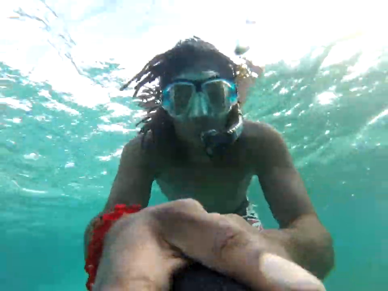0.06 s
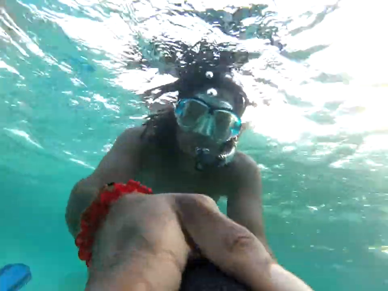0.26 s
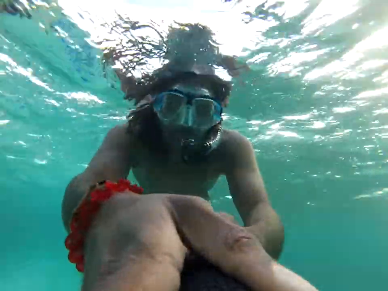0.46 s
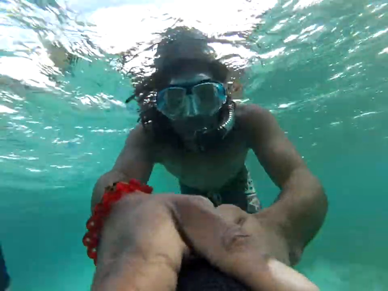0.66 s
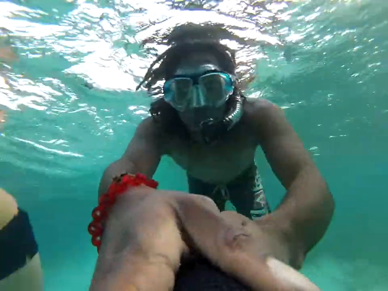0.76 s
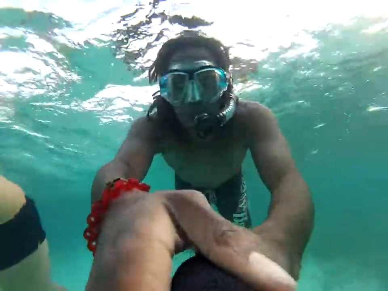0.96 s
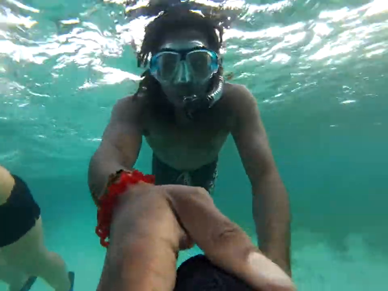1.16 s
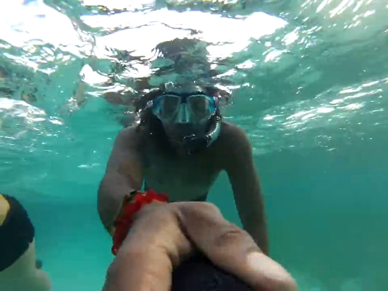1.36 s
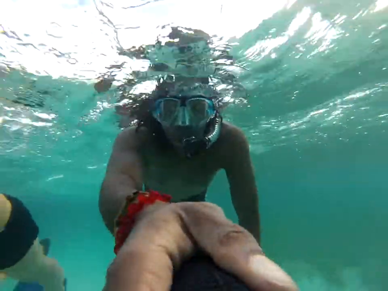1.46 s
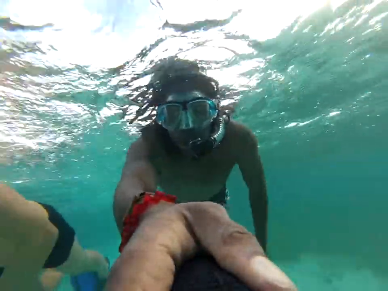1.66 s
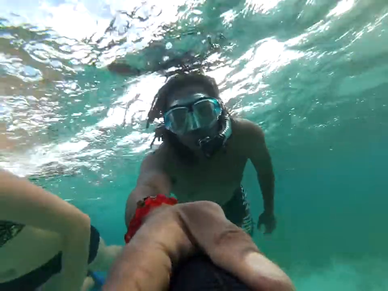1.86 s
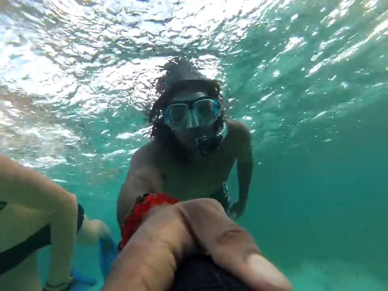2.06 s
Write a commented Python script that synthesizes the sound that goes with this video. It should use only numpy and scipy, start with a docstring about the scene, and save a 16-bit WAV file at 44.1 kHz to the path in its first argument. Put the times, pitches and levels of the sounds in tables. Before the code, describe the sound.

Muffled underwater rumble surges unevenly as swimmers move in shallow sea. A small bubble pings early, the surface gurgles overhead, and later something knocks once, followed by faint fizzing bubbles. The microphone is just below the surface.

```python
"""Shallow sea, among swimmers; microphone in a hand-held waterproof housing just under the surface.
Close up, moving water shoves against the housing and makes it rumble and boom. Just overhead the
surface sloshes, its bubbles ringing in a narrow, hollow band. A small bubble pings early on; later
something knocks once and a cloud of fine bubbles passes. Faint fizz and tiny snaps lie on top."""
import sys
import numpy as np
from scipy import signal
from scipy.fft import rfft, irfft
from scipy.io import wavfile
from scipy.ndimage import uniform_filter1d

SR = 44100
rng = np.random.default_rng(int(sys.argv[2]) if len(sys.argv) > 2 else 0)


def transcribe(signal):
    """Save signal, clipped to [-1, 1], as a 16-bit WAV file at the path in sys.argv[1]."""
    frames = np.atleast_2d(signal).T
    limited = np.clip(frames, -1, 1)
    pcm = np.round(limited * 32767).astype(np.int16)
    wavfile.write(sys.argv[1], SR, pcm)


N = 93315
T = np.arange(N) / SR
BIN_HZ = np.maximum(np.arange(N // 2 + 1) * SR / N, 1)
CUTOFF_HZ = 15300


def from_db(db):
    """Decibels to gain."""
    return 10 ** (np.asarray(db) / 20)


def unit_rms(x):
    """Scale to unit power."""
    return x / np.sqrt(np.mean(x ** 2) + 1e-20)


def level(points):
    """Gain through time from (time_s, level_db) points."""
    return from_db(np.interp(T, *np.transpose(points)))


def colour(x, points):
    """Filter through (frequency_hz, gain_db) points, falling steeply past both ends; rms 1."""
    hz, db = np.transpose(points)
    skirts = np.minimum(BIN_HZ / hz[0], 1) ** 3 * np.minimum(hz[-1] / BIN_HZ, 1) ** 4
    gain = from_db(np.interp(np.log(BIN_HZ), np.log(hz), db))
    return unit_rms(irfft(rfft(x) * skirts * gain, N))


def steady(x, span_s):
    """Hold a noise near rms 1 over spans longer than span_s."""
    return x / np.sqrt(uniform_filter1d(x ** 2, max(int(span_s * SR), 2)) + 1e-9)


def clicks(per_s, spread_db):
    """Clicks at random times, with a spread of sizes; rms 1."""
    sizes = from_db(spread_db * np.minimum(rng.exponential(1, N), 4)) * rng.choice([-1, 1], N)
    return unit_rms(sizes * (rng.random(N) < per_s / SR))


def tone(start_s, hz, drive_s, attack_s, t60_s, glide_per_s=0):
    """A resonance is driven for drive_s, then rings out; it glides by a share of its pitch a second."""
    t = np.maximum(T - start_s, 0)
    swell = np.sin(np.pi / 2 * np.minimum(t / attack_s, 1)) ** 2
    decay = from_db(-60 * np.minimum(np.maximum(t - drive_s, 0) / t60_s, 10))
    return swell * decay * np.sin(2 * np.pi * hz * t * (1 + glide_per_s * t / 2))


def swarm(per_s, centre_hz, spread_octaves, t60_s, glide_per_s=8.18):
    """Bubbles form at random, each a short rising note of its own pitch and strength; rms 1."""
    out, t = np.zeros(N), T[:int(2 * t60_s * SR)]
    for when, pitch, chance in rng.random((int(per_s * N / SR), 3)):
        start = int(when * N)
        hz = centre_hz * 2 ** (spread_octaves * (2 * pitch - 1))
        size_db = 2.5 * min(-np.log(1 - chance), 3)
        envelope = (1 - np.exp(-t * hz / 2)) ** 2 * from_db(size_db - 60 * t / t60_s)
        note = envelope * np.sin(2 * np.pi * hz * t * (1 + glide_per_s * t / 2))
        out[start:start + len(t)] += note[:N - start]
    return unit_rms(out)


def surge():
    """Water pushes past right at the housing: lumpy pressure and the rumble of its eddies."""
    # strength of the slow push and of the eddies: time_s, level_db
    push_levels = [(0, -25.5), (.16, -29.5), (.25, -23), (.34, -23), (.38, -34), (.43, -23), (.52, -32),
                   (.61, -39.5), (.86, -30), (1.02, -29), (1.08, -15), (1.17, -27.5), (1.28, -23),
                   (1.35, -28.5), (1.52, -38.5), (1.6, -33.5), (1.76, -44), (1.85, -35), (2.12, -50.5)]
    eddy_levels = [(0, -41.5), (.25, -44.5), (.47, -51.5), (.58, -42.5), (.73, -34), (.84, -45.5),
                   (1.1, -40.5), (1.19, -48), (1.33, -40), (1.52, -49), (1.58, -46), (1.8, -55.5),
                   (1.97, -55), (2.1, -42.5)]
    # their spectra: frequency_hz, gain_db
    push_spectrum = [(12, -2), (18, -1), (26, 1.5), (38, -7), (52, -11), (70, -15)]
    eddy_spectrum = [(50, -6), (75, -2), (105, 1.5), (150, -10), (220, -18), (330, -22.5)]
    push = steady(colour(rng.standard_normal(N), push_spectrum), span_s=0.058)
    eddies = steady(colour(rng.standard_normal(N), eddy_spectrum), span_s=0.076)
    return level(push_levels) * push + level(eddy_levels) * eddies


def slosh():
    """Just above the microphone a crowd of bubbles rings in a hollow band; the large ones glug."""
    # sloshing of the surface: time_s, level_db
    slosh_levels = [(0, -46.5), (.08, -45), (.2, -45), (.3, -52), (.48, -47), (.6, -49), (.75, -43),
                    (.83, -50.5), (.88, -44.5), (1.0, -48), (1.1, -38.5), (1.16, -51.5), (1.21, -43),
                    (1.32, -38.5), (1.42, -43), (1.56, -41), (1.65, -50.5), (1.75, -44.5), (1.86, -50.5),
                    (1.97, -44), (2.05, -53)]
    # its hollow band: frequency_hz, gain_db
    spectrum = [(230, -14), (350, -10.5), (410, -1.5), (500, 1.5), (610, -0.5), (700, -14), (860, -20.5),
                (1000, -37.5)]
    # large bubbles: start_s, level_db, pitch_hz, drive_s, glide_per_s
    burbles = [(0.351, -38.5, 597, 0.012, -0.5), (.468, -41, 566, .036, -2.5), (0.751, -32, 615, 0.0076, 4),
               (.871, -38, 525, .0076, 0), (1.09, -35.5, 408, 0.013, 2.5), (1.185, -32.5, 397, 0.018, 11),
               (1.217, -31, 458, 0.0176, 6), (1.24, -35.5, 510, 0.023, 4),
               (1.372, -25.5, 416.6, 0.017, 9.5), (1.429, -36, 416, .028, 0.5),
               (1.432, -32.5, 490.5, .033, 3), (1.491, -31, 503, .012, 8.5),
               (1.528, -30.5, 510, 0.035, -0.8), (1.535, -30, 597, 0.0063, -2),
               (1.559, -32.5, 381, 0.0074, -9.5), (1.589, -35, 478, 0.014, 5.5),
               (1.847, -36, 763, 0.0063, 4.5), (1.927, -40.5, 497, 0.019, 2),
               (2.07, -39.5, 487, 0.0082, 3.5), (2.094, -47.5, 790, 0.014, 0.5)]
    ringing = from_db(-2) * swarm(per_s=70, centre_hz=474.6, spread_octaves=0.24, t60_s=0.071)
    patter = colour(clicks(per_s=1000, spread_db=3), spectrum)
    glugs = sum(from_db(db) * tone(start_s, hz, drive_s, attack_s=0.011, t60_s=0.033, glide_per_s=glide)
                for start_s, db, hz, drive_s, glide in burbles)
    return level(slosh_levels) * steady(patter + ringing, span_s=0.05) + glugs


def churn():
    """Dense small bubbles rustle with the swimmers' strokes."""
    # churning of the water: time_s, level_db
    churn_levels = [(0, -60), (.23, -56), (.28, -62.5), (.56, -61.5), (.67, -56.5), (.76, -52.5),
                    (.82, -63), (.89, -53.5), (1.025, -61.5), (1.1, -51), (1.19, -65), (1.3, -49.5),
                    (1.41, -62), (2.12, -64)]
    # spectrum of the rustle: frequency_hz, gain_db
    spectrum = [(400, 4.5), (740, 12.5), (1020, -1.5), (1300, -3.5), (1600, 2.5), (1830, -3), (2200, 3.5),
                (2600, -4), (3800, -12.5), (5000, -55)]
    rustle = colour(clicks(per_s=1200, spread_db=0), spectrum)
    return level(churn_levels) * steady(rustle, span_s=0.056)


def fizz():
    """A faint bed of smooth hiss with the ticks of tiny bubbles in it."""
    # strength of the hiss: time_s, level_db
    hiss_levels = [(0, -66), (.9, -66.5), (1.2, -64.5), (1.53, -63.5), (1.64, -65)]
    # its spectrum: frequency_hz, gain_db
    spectrum = [(1000, 4.5), (4600, -3), (5500, -1.5), (6400, -6), (7500, -3), (9000, -6), (11000, -3),
                (15500, -12.5)]
    ticks = from_db(-9) * swarm(per_s=300, centre_hz=4640, spread_octaves=0.78, t60_s=0.0046)
    hiss = colour(rng.standard_normal(N), spectrum)
    return level(hiss_levels) * (hiss + ticks)


def booms():
    """Each gulp of water drives a deep resonance of the housing for a few cycles."""
    # gulps against the housing: start_s, gain_db, pitch_hz, drive_s
    gulps = [(0.045, -26, 86.6, 0.027), (0.21, -21.5, 88.3, 0.033), (0.31, -17, 83, 0.012),
             (0.406, -20.5, 90, 0.01), (0.437, -23, 97.5, 0.022), (0.671, -22, 92, 0.045),
             (.76, -25.5, 96.6, 0.032), (0.862, -22, 98.4, 0.022), (0.897, -26.5, 101, 0.038),
             (1.099, -17, 98.3, 0.019), (1.255, -22, 97.9, 0.027), (1.289, -24, 99.3, 0.032),
             (1.345, -19, 99.3, 0.026), (1.558, -30, 105, 0.0083)]
    return sum(from_db(db) * tone(start_s, hz, drive_s, attack_s=0.021, t60_s=0.07, glide_per_s=0.2)
               for start_s, db, hz, drive_s in gulps)


def pings():
    """Small bubbles pinch off with a bright tick and ring on briefly."""
    # bubbles pinching off: start_s, gain_db, pitch_hz
    bubbles = [(.1228, -42, 2320), (0.134, -14.5, 2232), (1.578, -44, 2070), (1.666, -43, 2310),
               (1.68, -39.5, 2390)]
    # modes of each ping: pitch_ratio, gain_db, t60_s
    modes = [(.94, -9.5, 0.042), (1.0, -2.5, 0.0098), (.72, -10.5, 0.0039), (1.64, -12, 0.011)]
    rings = sum(from_db(db + mode_db)
                * tone(start_s, hz * ratio, drive_s=0.00058, attack_s=0.00029, t60_s=t60_s)
                for start_s, db, hz in bubbles for ratio, mode_db, t60_s in modes)
    return signal.sosfilt(signal.butter(2, (1650, 2536), "band", fs=SR, output="sos"), rings)


def snaps():
    """Very short bursts of crackle, each around its own pitch."""
    # sharp little snaps: start_s, peak_db, centre_hz, half_width_octaves, burst_t60_s
    bursts = [(.134, -35, 617, 0.29, .025), (.292, -49.5, 11500, .08, .006), (.293, -55, 5300, .07, .016),
              (.333, -51, 11800, 0.086, .005), (1.098, -44, 1900, 1.36, 0.006),
              (1.118, -42.5, 2600, 1.4, 0.005), (1.135, -43.5, 2100, 1.3, 0.0065),
              (1.927, -54, 3700, .06, .018), (2.079, -49, 3800, 0.066, 0.024)]
    out = np.zeros(N)
    for start_s, db, hz, octaves, t60_s in bursts:
        envelope = (T >= start_s) * from_db(-60 * np.clip((T - start_s) / t60_s, 0, 10))
        edges_hz = [hz / 2 ** octaves, min(hz * 2 ** octaves, CUTOFF_HZ)]
        band = signal.butter(2, edges_hz, "band", fs=SR, output="sos")
        snap = signal.sosfilt(band, rng.standard_normal(N) * envelope)
        out += from_db(db) * snap / np.abs(snap).max()
    return out


def whistle():
    """A thin, faint whistle sounds briefly, very high."""
    return from_db(-63) * tone(start_s=1.268, hz=10200, drive_s=0.038, attack_s=0.011, t60_s=0.033)


def knock():
    """One click through the housing's damped resonances: a clack, bright then hollow, and a thud."""
    # resonances of the housing: frequency_hz, gain_db
    resonances = [(200, -22), (330, -19), (420, -5.5), (570, 2.5), (850, -7.5), (1020, -24), (1300, -18),
                  (1560, -5.5), (1850, -15), (2350, -12), (2700, -30.5), (3350, -32.5), (3900, -51)]
    start_s, lag_s, lag_fade_hz = 1.3572, 0.0021, 1050
    hz, db = np.transpose(resonances)
    gain = from_db(np.interp(np.log(BIN_HZ), np.log(hz), db)) * np.minimum(hz[-1] / BIN_HZ, 1) ** 2
    # minimum phase: the housing rings only after the click
    cepstrum = irfft(np.log(gain), N)
    response = np.exp(rfft(cepstrum * 2 * (np.arange(N) < N // 2)))
    # the lows arrive up to lag_s behind the highs
    delay_turns = start_s * BIN_HZ + lag_s * lag_fade_hz * (1 - np.exp(-BIN_HZ / lag_fade_hz))
    clack = irfft(response * np.exp(-2j * np.pi * delay_turns), N)
    thud = tone(start_s, hz=108, drive_s=0.0051, attack_s=0.0051, t60_s=0.0102)
    return from_db(-14.5) * clack / np.abs(clack).max() + from_db(-21.5) * thud


def cloud():
    """A cloud of fine bubbles sparkles past the microphone, fading faster than it swells."""
    # bubble sizes: centre_hz, spread_octaves, t60_s, relative_db
    sizes = [(1517, 0.094, 0.031, -1.5), (2210, 0.21, 0.017, 1.5), (3890, 0.21, 0.011, -4),
             (7250, 0.16, 0.0044, -8)]
    crest_s, rise_s, fall_s, bubbles_per_s = 1.529, 0.12, 0.061, 650
    sparkle = sum(from_db(db) * swarm(bubbles_per_s, hz, octaves, t60_s)
                  for hz, octaves, t60_s, db in sizes)
    swell = np.exp(-((T - crest_s) / np.where(T < crest_s, rise_s, fall_s)) ** 2)
    return from_db(-54.5) * swell * unit_rms(sparkle)


def scene():
    """Everything reaches one microphone inside the housing."""
    water = surge() + slosh() + churn() + fizz()
    return (water + booms() + pings() + snaps() + whistle() + knock() + cloud())[None]


def record(dry):
    """A 3 ms fade-in and a steep cut of the top treble."""
    fade_in = np.minimum(T / 0.003, 1)
    return signal.sosfilt(signal.ellip(12, 0.1, 80, CUTOFF_HZ, fs=SR, output="sos"), dry * fade_in)


dry = scene()
out = record(dry)
transcribe(out)
```